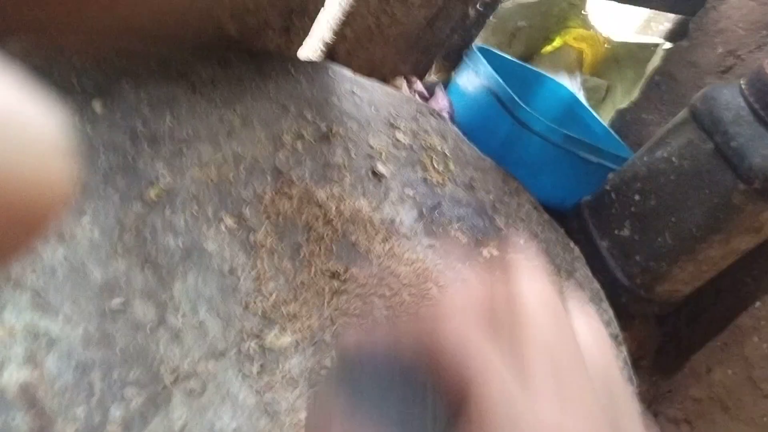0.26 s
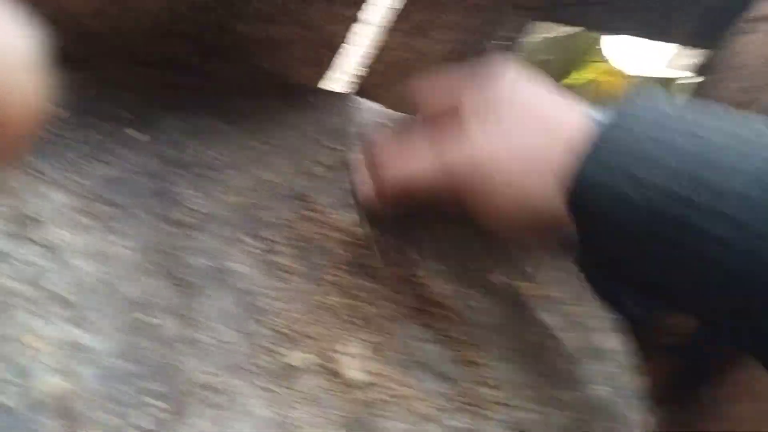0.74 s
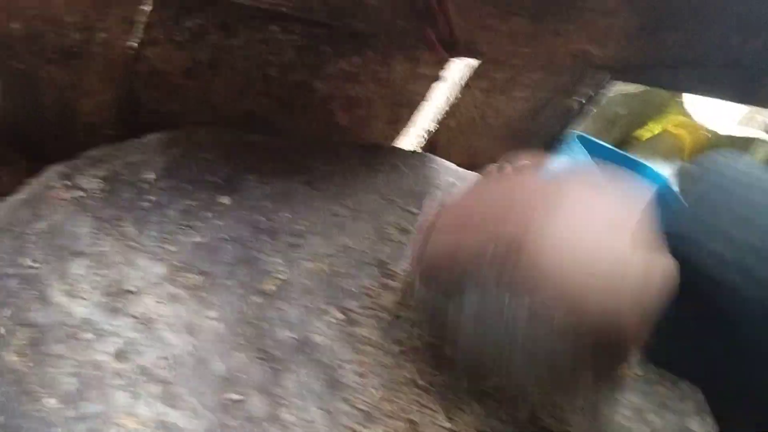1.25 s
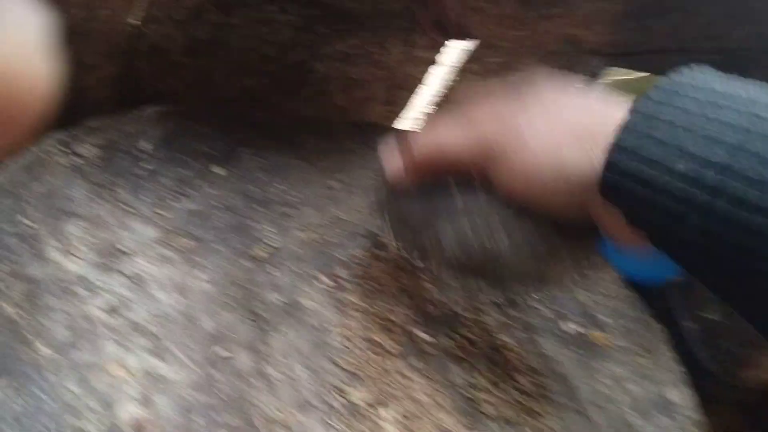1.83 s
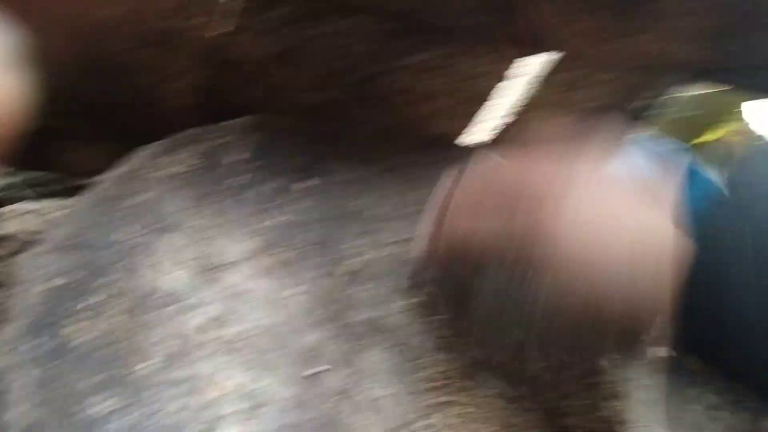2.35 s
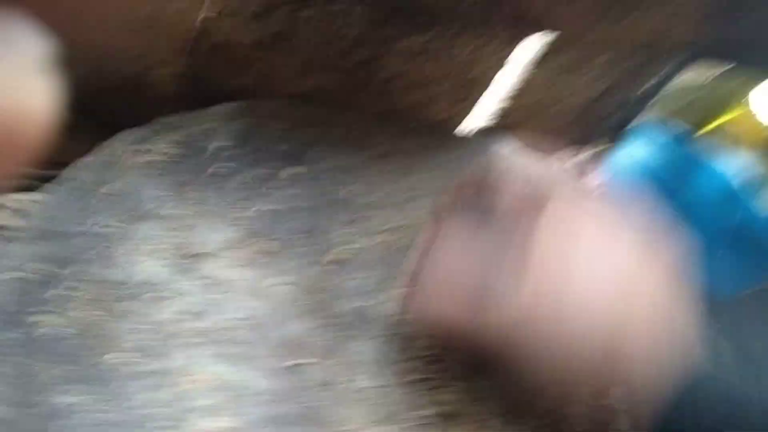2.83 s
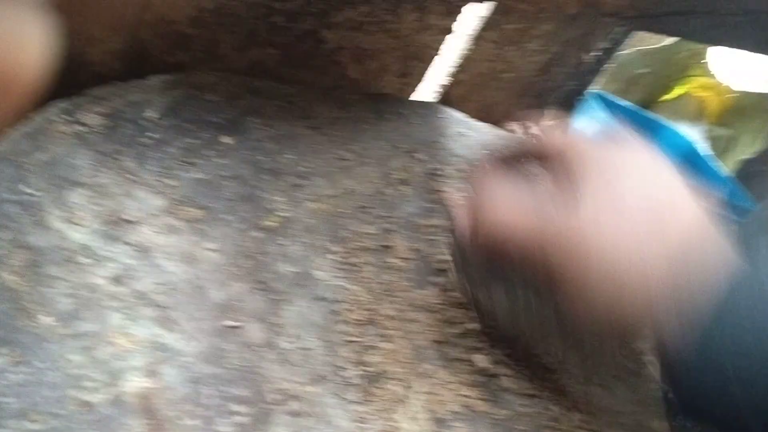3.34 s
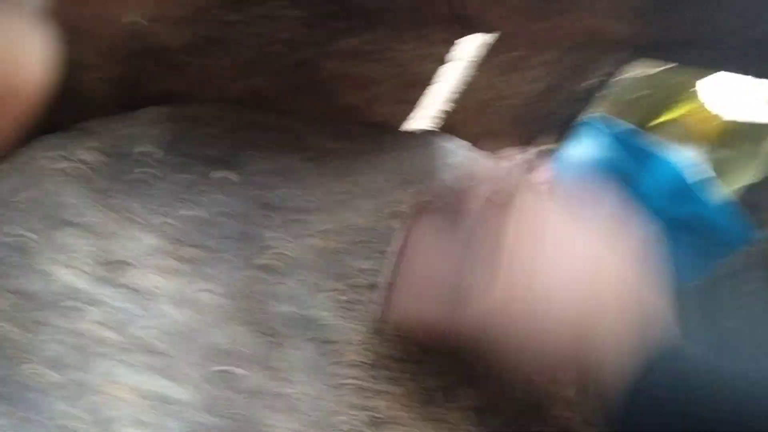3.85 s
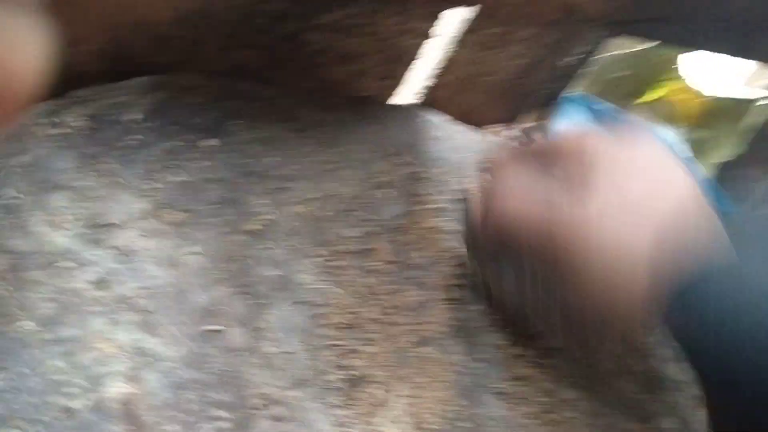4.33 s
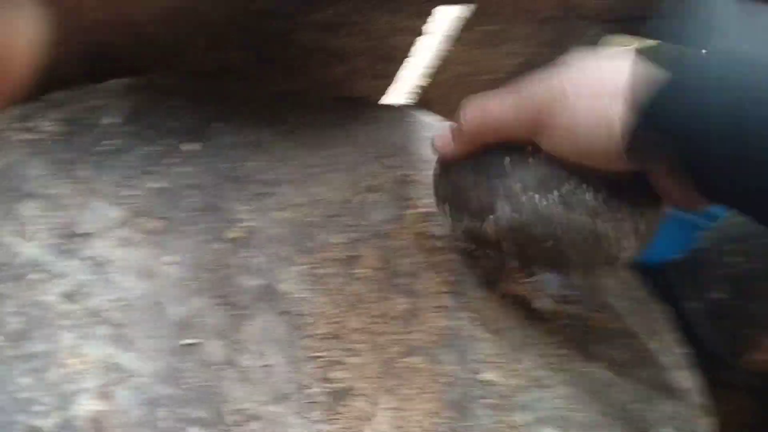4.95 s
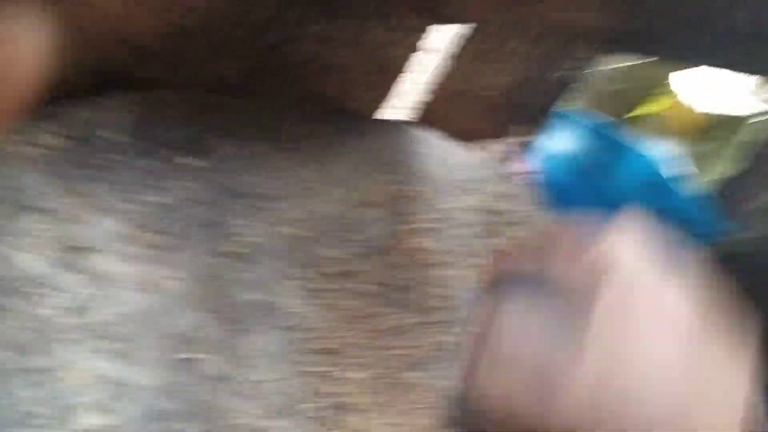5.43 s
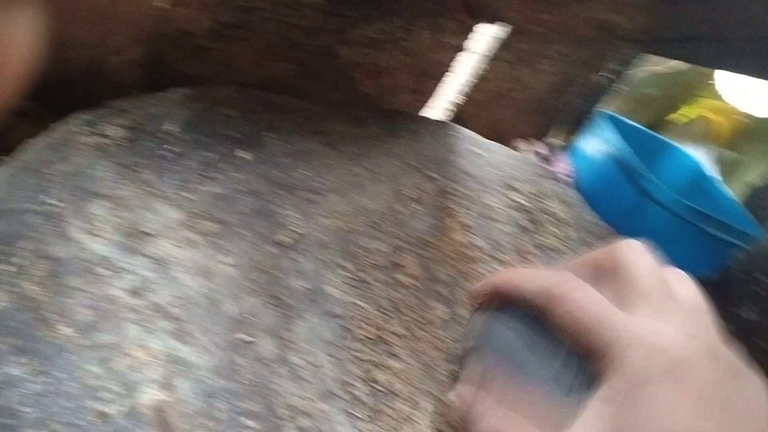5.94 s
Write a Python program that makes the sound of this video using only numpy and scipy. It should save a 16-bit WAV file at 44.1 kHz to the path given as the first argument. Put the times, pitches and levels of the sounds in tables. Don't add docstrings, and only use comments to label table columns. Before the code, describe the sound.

Short, rough stone-on-stone grinding strokes hiss and crunch over dry seeds, broken by hard, dull clunks as the stone lands on the slab.

```python
import sys
import numpy as np
from scipy import signal
from scipy.fft import rfft, irfft, next_fast_len
from scipy.io import wavfile
from scipy.ndimage import uniform_filter1d, map_coordinates

SR = 44100
rng = np.random.default_rng(int(sys.argv[2]) if len(sys.argv) > 2 else 0)


def transcribe(u):
    v = np.clip(np.atleast_2d(u).T, -1, 1)
    q = np.round(v * 32767).astype(np.int16)
    wavfile.write(sys.argv[1], SR, q)


def volts_from_decibels(level):
    exponent = np.asarray(level, float) / 20
    return 10 ** exponent


N = 272566

# centre_hz, width_hz, left_db, right_db
THUD = [(315, 100, -6.5, -8), (400, 55.5, -2, -1.5), (468, 95, 1.5, 0), (563, 81, -0.5, -19),
        (784, 81, -8, -22), (990, 710, -6.5, -6.5)]
RING = [(1098, 51, -10, 4), (1327, 86, -5, -5)]
BRIGHT = [(1787, 135, 1, 5), (2169, 150, -7, -10), (2644, 69, -43, -9), (3300, 180, -18, -14.5)]
BOOM = [(108, 19.8, 10, 10), (143, 15, -20.5, -9)]
# frequency_hz, left_minus_right_db
PORTS = [(2500, 0), (4400, -1), (8000, 1.5), (11500, 2.5), (13500, 14.5), (16000, 0.5)]


def rubbing():
    # frequency_hz, level_db (per Hz)
    grit = [(1600, -15.5), (2800, 4.5), (3600, -1.5), (4400, 4), (5300, 2), (6500, 1.5), (8700, 4),
            (11000, 2.5), (14500, -7.5), (16000, -5)]
    # time_s, bright_over_ring_db, ring_over_thud_db
    spot = [(0, 0.5, 1.5), (.5, 0.5, 0.5), (1, -5, 0.5), (1.4, 9, 1), (1.7, 7, 5), (1.9, -2.5, 6),
            (2.05, 17.5, 11.5), (2.18, -3.5, 21), (2.3, 3.5, 2.5), (2.6, 10, 6.5), (3.3, 3, -1.5),
            (3.6, -5.5, 2), (4, 14.5, -2.5), (4.5, -5.5, -9.5), (5, -1.5, -2.5), (5.5, -13, -8),
            (5.75, -2, 2), (6.18, -14, -25)]
    # lateness and pointedness (each 1) of a push, of a pull
    # and of a bite, dying_s, lingering_share (1)
    slide = (1.11, 0.91, 1.21, 1.1, 0.82, .45, 0.018, 0.66)
    press = (1.4, 0.42, 0.95, 0.97, 0.2, 0.58, .01, .7)
    lean = (2.08, 0.98, 1, 0.38, 1.9, 0.37, 0.017, 0.63)
    hiss_db = strokes(slide, order=2)
    thud_db = strokes(press, order=3)
    boom_db = strokes(lean, order=4)
    spot_db, tilt_db = curves(spot)
    ring_db = thud_db + tilt_db
    shudder = wobble(45)

    grains = np.array([bumps(3500, spread_db=4.5, smooth=1.6) for port in range(2)])
    grains = patchy(grains * volts_from_decibels(0.43 * shudder), depth_db=3.03, size=12)
    hiss = unit(filtered(grains, lambda hz: volts_from_decibels(along(grit, hz)) * port_gain(hz)))
    hiss = volts_from_decibels(hiss_db + 0.03 + 2.5 * wobble(40)) * hiss

    contact = bumps(900, spread_db=3.0, smooth=0.72) * volts_from_decibels(1.8 * shudder)
    contact = unit(patchy(contact, depth_db=3.6, size=16))

    def force(hz):
        return 1 / (1 + (hz / 3300) ** 4) * 1j * hz / (150 + 1j * hz)

    def thud_response(hz):
        return force(hz) * modes(THUD, hz, lag_ms=0.15) / (1 + (hz / 650) ** 4)

    def ring_response(hz):
        return force(hz) * modes(RING, hz, lag_ms=0.2) * hz ** 2 / (hz ** 2 + 800 ** 2)

    def bright_response(hz):
        return force(hz) * modes(BRIGHT, hz, lag_ms=0.47) * hz ** 4 / (hz ** 4 + 1400 ** 4)

    thud = filtered(contact * volts_from_decibels(thud_db + 15.5), thud_response)
    ring = filtered(contact * volts_from_decibels(ring_db + 19.5 - spot_db / 2), ring_response)
    ring += filtered(contact * volts_from_decibels(ring_db + 11 + spot_db / 2), bright_response)

    def boom_response(hz):
        high_pass = (1j * hz / (70 + 1j * hz)) ** 4
        return modes(BOOM, hz, lag_ms=0.076) * high_pass / (1 + (hz / 310) ** 2)

    ground = bumps(210, spread_db=1.5, smooth=0.79) * volts_from_decibels(1.9 * shudder + boom_db + 25)
    return hiss + thud + ring + filtered(ground, boom_response)


def strokes(shape, order):
    # start_s, length_s, speed_db, pressure_db, weight_db (on the ground)
    push = [(-0.02, 0.16, -53, -52.5, -44), (0.265, 0.19, -56, -54.5, -43), (0.593, 0.1, -56, -53, -53),
            (1.064, 0.1, -47.5, -47, -47.5), (1.362, 0.15, -60, -52, -50.5), (1.628, 0.16, -55, -60, -48.5),
            (1.997, 0.24, -71, -61.5, -68), (2.175, 0.105, -46.5, -56.5, -47),
            (2.47, 0.16, -58, -58.5, -59), (2.775, 0.11, -51.5, -54.5, -46),
            (3.05, 0.12, -55.5, -52, -48.5), (3.5, 0.12, -53, -51.5, -43.5),
            (3.797, 0.149, -56.5, -58.5, -49.5), (4.093, 0.11, -56.5, -46, -51.5),
            (4.5, 0.1, -53.5, -42, -43), (4.785, 0.12, -54.5, -49, -49), (5.205, 0.13, -52, -43, -44.5),
            (5.525, 0.11, -55, -49, -48.5), (5.99, 0.081, -54.5, -54, -45)]
    pull = [(0.141, 0.11, -48.5, -42.5, -59), (0.442, 0.11, -47.5, -41, -47),
            (0.732, 0.074, -60.5, -48, -50), (1.222, 0.12, -52.5, -47.5, -55),
            (1.524, 0.075, -46, -47, -45), (1.791, 0.091, -49, -51, -46), (2.308, 0.1, -47.5, -50, -60),
            (2.604, 0.12, -49.5, -50.5, -51.5), (2.918, 0.084, -46.5, -46, -55),
            (3.193, 0.092, -54, -47.5, -50), (3.626, 0.11, -48.5, -47.5, -51.5),
            (3.939, 0.096, -51.5, -43.5, -65.5), (4.198, 0.11, -61, -47.5, -53),
            (4.619, 0.098, -49.5, -43.5, -59), (4.899, 0.15, -54.5, -43, -55.5),
            (5.366, 0.11, -51, -41, -57.5), (5.675, 0.077, -61, -57, -54), (6.098, 0.12, -55, -49, -59)]
    bite = [(.158, .04, -56, -52, -52), (.362, 0.068, -94.5, -50, -48), (.672, .04, -63.5, -49.5, -39.5),
            (1.088, 0.026, -68.5, -35, -50), (1.145, 0.028, -42, -74, -49), (1.245, 0.023, -45, -56, -74),
            (1.448, 0.031, -49, -90, -68), (2.36, 0.029, -60.5, -59, -55), (2.462, 0.057, -73.5, -50, -76),
            (2.52, 0.046, -50, -66, -80), (3.29, .18, -82, -71.5, -72.5), (4.548, 0.015, -51, -52, -53.5),
            (4.69, 0.021, -54.5, -38, -60), (5.375, 0.023, -76, -43.5, -60.5),
            (6.008, 0.012, -59, -62, -55)]
    *arch, dying_s, lingers = shape
    t, total = np.arange(N) / SR, np.zeros(N)
    for table, late, pointed in (push, *arch[:2]), (pull, *arch[2:4]), (bite, *arch[4:]):
        for row in table:
            start_s, length_s, level_db = row[0], row[1], row[order]
            part = slice(max(round(start_s * SR), 0), round((start_s + length_s) * SR))
            done = np.clip((t[part] - start_s) / length_s, 0, 1)
            total[part] += volts_from_decibels(level_db) * np.abs(np.sin(np.pi * done ** late)) ** pointed
    keep, lingers = np.exp(-1 / (dying_s * SR)), np.clip(lingers, 0, 1)
    lingering = signal.lfilter([1 - keep], [1, -keep], total ** 2)
    power = (1 - lingers) * total ** 2 + lingers * lingering
    return 10 * np.log10(power + 1e-12)


def knocks():
    # time_s, peak_db, centre_hz (of the blow), ring_db, hand_stone_db
    flat_blows = [(0.365, -33, 400, -12, -68), (0.418, -24.5, 525, -13, -19), (0.487, -31, 484, -20, -48),
                  (0.673, -29.5, 343, -20, -44), (1.004, -9.5, 555, -26.5, -30),
                  (1.308, -35.5, 313, -47, -28), (2.104, -10, 450, -22.5, -48),
                  (2.185, -18.5, 510, -24.5, -20), (2.199, -11.5, 603, -22, -5),
                  (3.483, -14.5, 424, -24.5, -37.5), (4.137, -42, 343, -23, -3), (4.472, -9, 546, -31, -28),
                  (4.51, -27, 546, -25, -46), (5.007, -17, 462, -18.5, -18), (5.199, -8.5, 443, -30.5, -40),
                  (5.297, -26, 400, -38, -30), (5.607, -34, 337, -16, -45)]
    # time_s, peak_db, centre_hz, ring_db, slab_rim_db
    edge_blows = [(0.159, -27.5, 1110, -22, -12), (1.095, -27.5, 1070, -14, -2.5),
                  (1.244, -40, 1130, -2, -10), (1.503, -22.5, 1030, -12, -29),
                  (1.761, -25.5, 1010, -17, -15), (1.81, -32, 1260, -5, -12), (1.962, -42, 1420, -33, 18),
                  (2.936, -42, 1120, -3, -20), (3.908, -13.5, 1130, -20.5, -19),
                  (4.18, -19.5, 1240, -18, -15.5), (4.225, -32, 1170, -17, -23),
                  (4.259, -29, 1110, 14, 17.5), (5.376, -33.5, 1110, -2, -6), (5.9168, -6, 970, -18.5, -5)]
    size = 8192
    out, f = np.zeros((2, N + size)), np.fft.rfftfreq(size, 1 / SR)
    edge = -1j * f / (900 + 1j * f) * np.exp(-(f / 3000) ** 4 - 2j * np.pi * f * 0.003167)
    low = modes(THUD, f, lag_ms=0.13)
    deep = modes(BOOM, f, lag_ms=0.14)
    ring = modes(RING, f, lag_ms=0.45) / (1 + (f / 1700) ** 4)
    stone = modes(BRIGHT[:1], f, lag_ms=0.58)
    rim = modes(BRIGHT[1:], f, lag_ms=0.43)
    rows = [(*row, -26) for row in flat_blows]
    rows += [(*row, rim_db - 5.5, rim_db) for *row, rim_db in edge_blows]
    for s, db, hz, ring_db, stone_db, rim_db in rows:
        pulse = -1j * f / hz * np.exp(-(f / (1.775 * hz)) ** 2 - 2j * np.pi * f * 0.003294)
        body = low + volts_from_decibels(-7) * (500 / hz) ** 2 * deep
        bright = volts_from_decibels(ring_db + 25) * ring + volts_from_decibels(stone_db + 3.5) * stone
        bright = bright + volts_from_decibels(rim_db + 11.5) * rim + volts_from_decibels(rim_db - 9)
        blow = irfft(pulse * body + edge * bright)
        out[:, round(s * SR):][:, :size] += volts_from_decibels(db + 2.5) * blow / np.abs(blow).max()
    return out[:, :N]


def cracks():
    # time_s, peak_db, left_minus_right_db
    snaps = [(1.0064, -48, -2), (1.078, -66, -1), (1.2461, -46, 27), (1.964, -61.5, -0.5),
             (2.1058, -41, 1), (2.3884, -41, 7.5), (2.635, -34.5, -6), (3.485, -55, 0.5),
             (4.1688, -35, -3), (4.261, -51, 12), (4.4735, -46, 2.5), (4.5593, -38, 8),
             (5.202, -46.5, 4.5), (5.9172, -36, -11), (6.0139, -50, -5)]
    out, t = np.zeros((2, N + 400)), np.arange(400) / SR
    for s, db, pan_db in snaps:
        tick = rng.standard_normal((2, len(t))) * volts_from_decibels(-60 * t / 0.005)
        sides_db = np.array([[0.5], [-0.5]]) * pan_db
        out[:, round((s + 0.001) * SR):][:, :len(t)] += volts_from_decibels(db + 4 + sides_db) * tick

    def colour(hz):
        return port_gain(hz) * hz ** 2 / (hz ** 2 + 2500 ** 2) / (1 + (hz / 11000) ** 4)

    return filtered(out[:, :N], colour)


def kitchen(x):
    # frequency_hz, t60_s
    decay = [(200, 0.23), (1000, 0.15), (3000, 0.15), (9000, 0.063)]
    out = np.zeros((2, N + SR))
    for start in range(0, N, SR // 4):
        shared, own = rng.standard_normal(SR // 3), rng.standard_normal((2, SR // 3))
        hz, t, z = signal.stft(shared + 0.85 * own, SR, nperseg=256)
        decayed = z * volts_from_decibels(-60 * t / along(decay, hz)[:, None])
        tail = signal.istft(decayed, SR, nperseg=256)[1]
        tail = tail * (1 - np.exp(-np.arange(tail.shape[1]) / SR / 0.0042))
        wet = signal.fftconvolve(x[:, start:start + SR // 4], tail / np.linalg.norm(tail[0]), axes=1)
        out[:, start + 150:][:, :wet.shape[1]] += wet
    return out[:, :N]


def air():
    # frequency_hz, level_db (per Hz)
    density = [(30, -19.5), (100, -8.5), (400, -6.5), (900, -10), (1300, -7.5), (2500, -10.5), (6000, -15),
               (10000, -23.5), (16000, -30.5)]
    # frequency_hz, likeness (1)
    likeness = [(60, 0.49), (300, 0.45), (700, 0.13), (1500, 0.79), (4000, .05)]

    def mid_side(hz):
        turn = np.arccos(np.clip(along(likeness, hz), -1, 1)) / 2
        return volts_from_decibels(along(density, hz)) * [np.cos(turn), np.sin(turn)]

    mid, side = filtered(rng.standard_normal((2, N)), mid_side)
    return volts_from_decibels(-69 + 0.73 * wobble(12.0)) * unit(np.array([mid + side, mid - side]))


def modes(table, f, lag_ms):
    both = 0
    for c, w, left, right in table:
        both = both + volts_from_decibels([[left], [right]]) * 1j * f * w / (c * c - f * f + 1j * f * w)
    return both * np.exp(-2j * np.pi * f * np.array([[lag_ms / 1e3], [0]]))


def port_gain(hz):
    return volts_from_decibels(along(PORTS, hz) * np.array([[0.5], [-0.5]]))


def bumps(per_s, spread_db, smooth):
    hit = rng.random(N) < per_s / SR
    size_db = spread_db * np.minimum(rng.exponential(size=N), 3.2)
    sizes = hit * rng.standard_normal(N) * volts_from_decibels(size_db)
    return unit(unit(sizes) + smooth * rng.standard_normal(N))


def wobble(rate):
    return map_coordinates(rng.standard_normal(int(N * rate / SR) + 4), [np.arange(N) * rate / SR])


def smooth_field(shape, across, size):
    field = uniform_filter1d(rng.standard_normal(shape), size=across, axis=0)
    return unit(uniform_filter1d(field, size=size, axis=1))


def patchy(x, depth_db, size):
    z = signal.stft(x, nperseg=256)[2]
    field = smooth_field(z.shape[-2:], 3, size)
    return signal.istft(z * volts_from_decibels(depth_db * field), nperseg=256)[1][..., :N]


def curves(rows):
    s, *cols = np.transpose(rows)
    return [np.interp(np.arange(N) / SR, s, c) for c in cols]


def along(points, hz):
    f, v = np.transpose(points)
    return np.interp(np.log(hz + 1), np.log(f + 1), v)


def filtered(x, response):
    m = next_fast_len(N + 8192)
    return irfft(rfft(x, m) * response(np.fft.rfftfreq(m, 1 / SR)), m)[..., :N]


def unit(x):
    return x / np.sqrt(np.mean(x ** 2) + 1e-20)


def scene():
    blows = knocks() + cracks()
    rub = rubbing()
    return blows + rub + kitchen(volts_from_decibels(-16.5) * blows + volts_from_decibels(-22.5) * rub) + air()


def dropouts(x):
    hz, t, z = signal.stft(x, SR, nperseg=1024)
    field = smooth_field(z.shape[1:], 5, 7)
    likely = np.exp(-(np.log((hz + 1) / 4300) / 0.55) ** 2)[:, None]
    weak = np.abs(z).max(0) < volts_from_decibels(-60)
    gain = np.where(weak & (field * likely > 1.0), volts_from_decibels(-30), 1)
    return signal.istft(z * gain, SR, nperseg=1024)[1][:, :N]


def low_pass(x):
    return signal.sosfilt(signal.butter(12, 16680, fs=SR, output="sos"), x)


def record(dry):
    mix = filtered(dropouts(dry), lambda hz: hz < 15830)
    return low_pass(mix)


dry = scene()
out = record(dry)
transcribe(out)
```